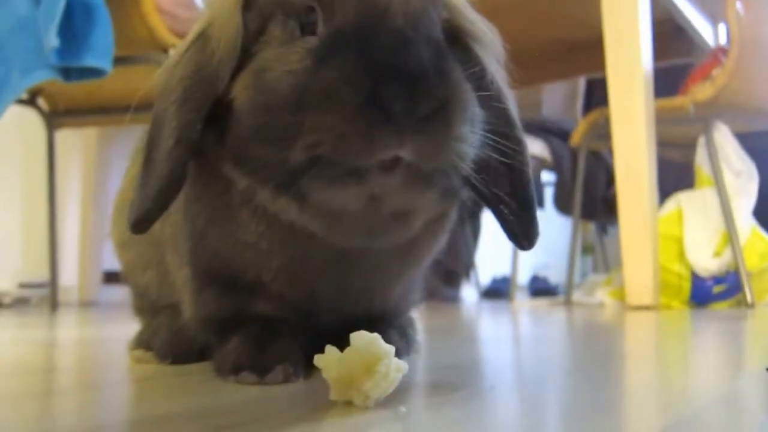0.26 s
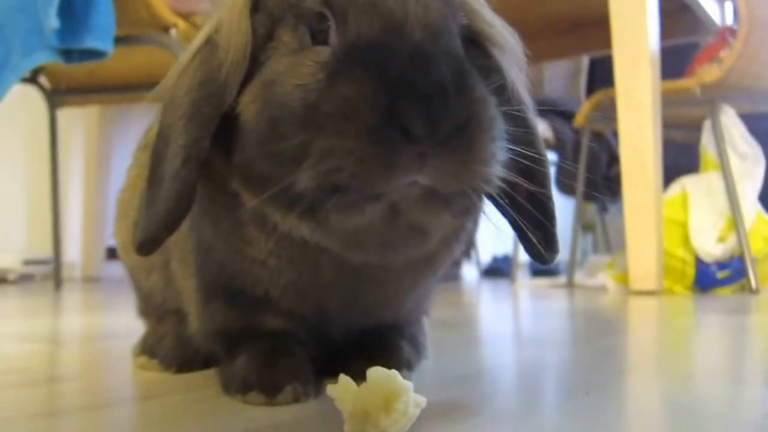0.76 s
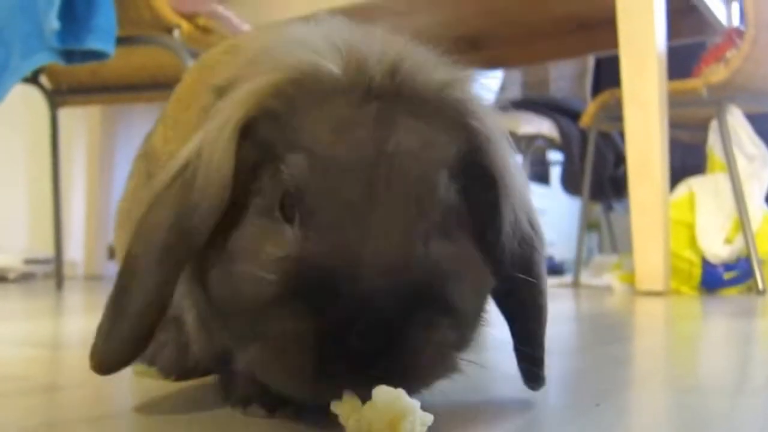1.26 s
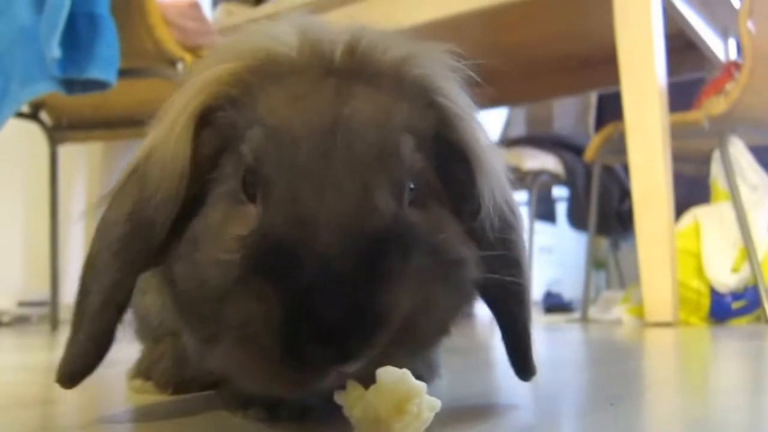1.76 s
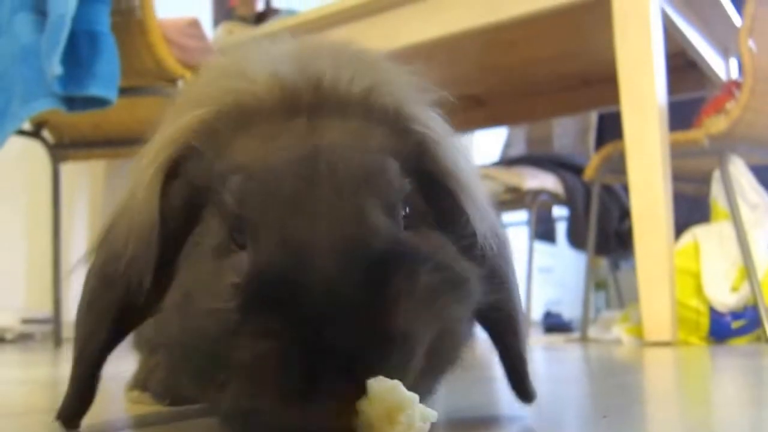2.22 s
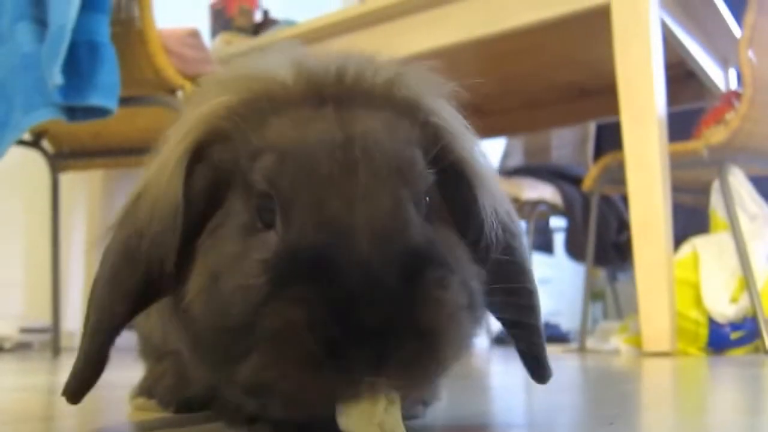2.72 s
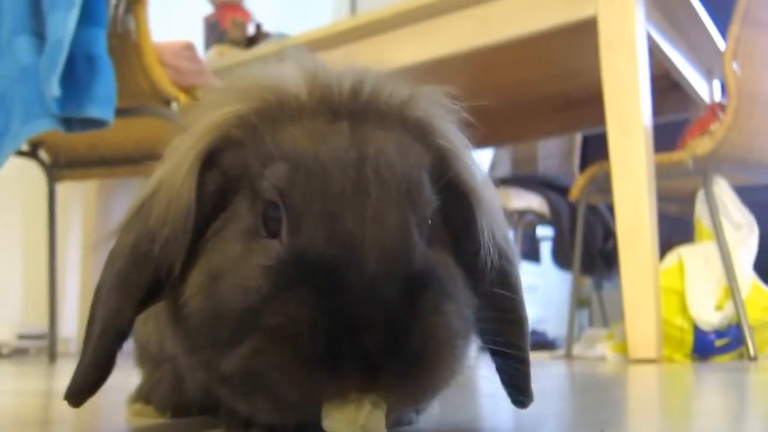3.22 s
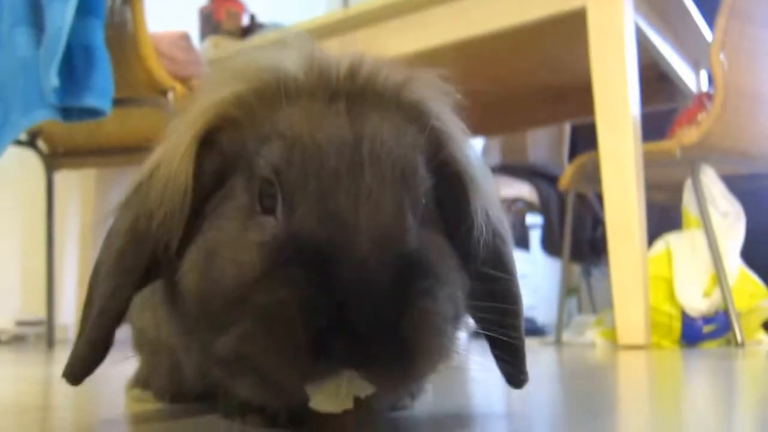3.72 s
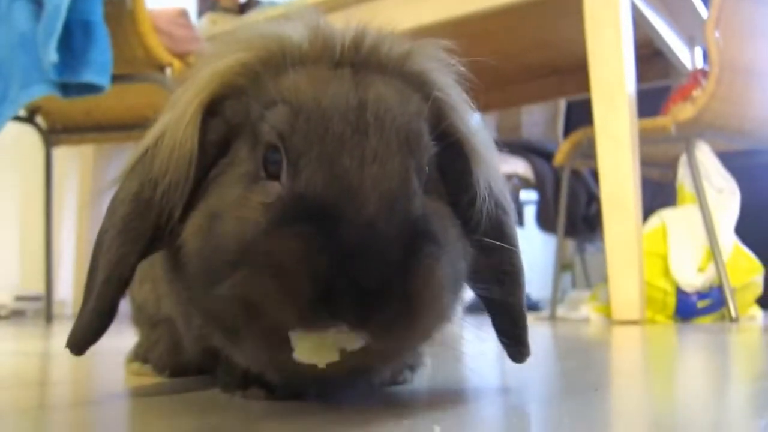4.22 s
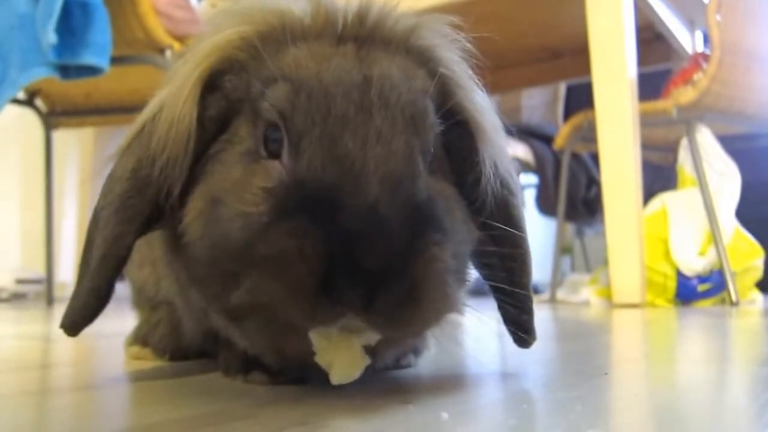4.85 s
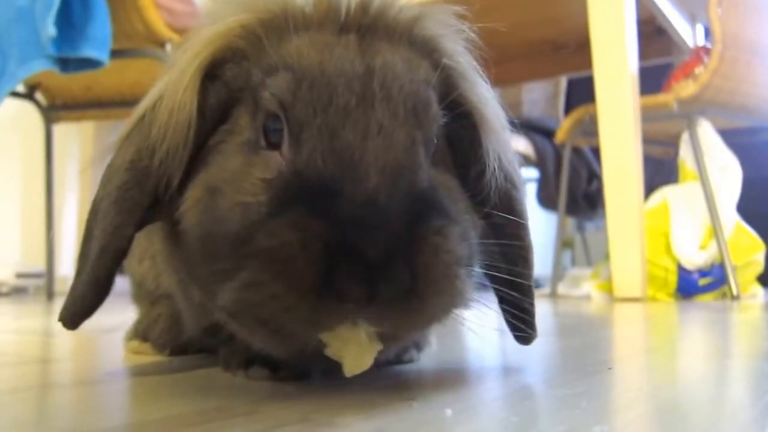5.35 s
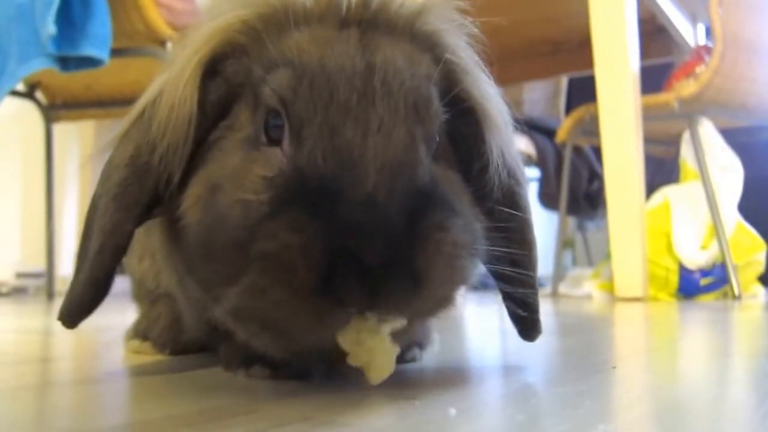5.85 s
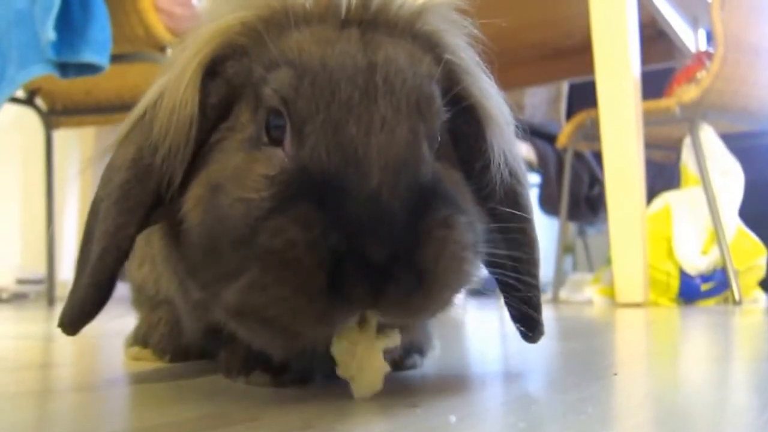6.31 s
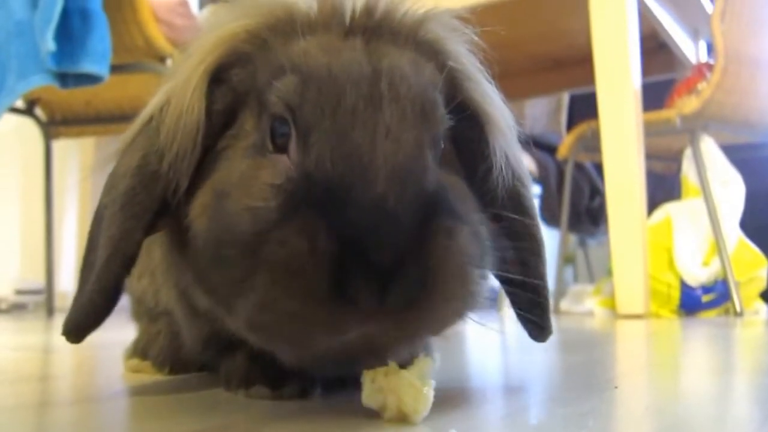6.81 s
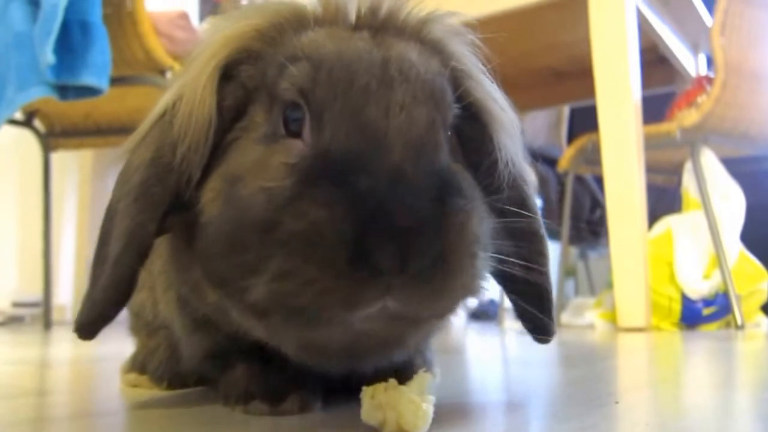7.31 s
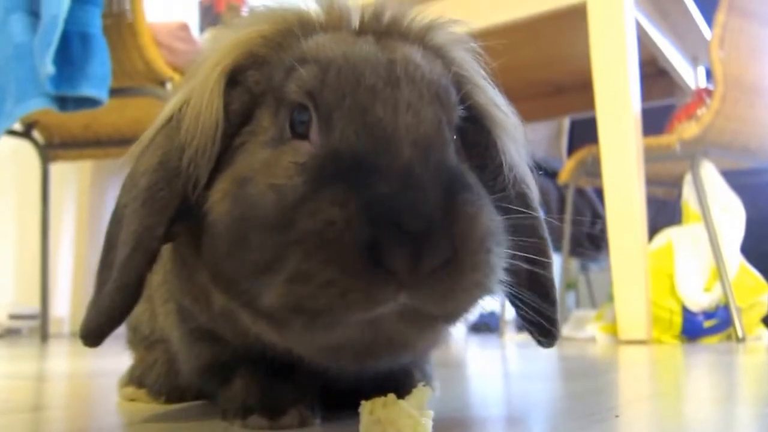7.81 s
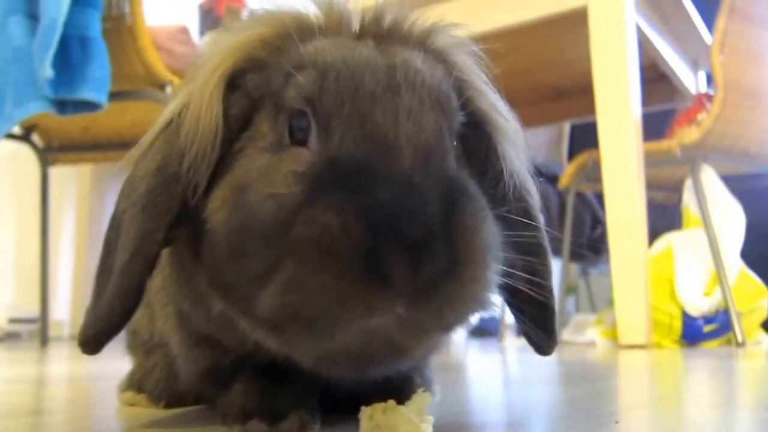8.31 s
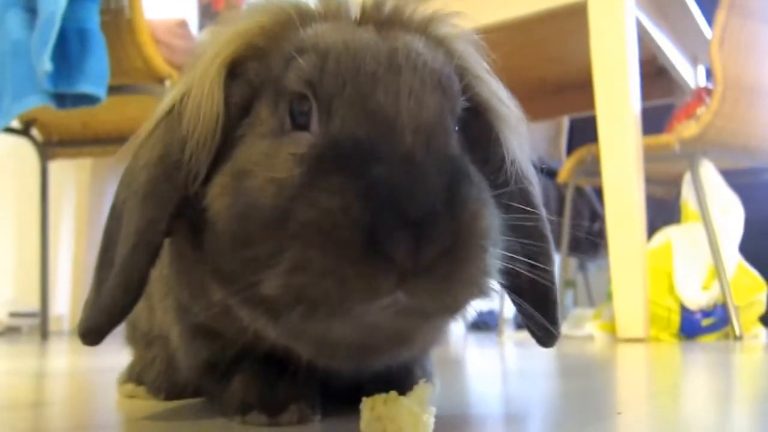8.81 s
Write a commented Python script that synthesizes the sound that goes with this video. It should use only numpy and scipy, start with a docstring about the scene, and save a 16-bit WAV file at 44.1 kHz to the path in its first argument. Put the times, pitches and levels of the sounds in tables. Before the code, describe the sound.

Close, moist nibbling by a rabbit crackles over a faint low hum, after a scuff and two loud thuds, with fur brushing softly.

```python
"""A rabbit chews a piece of banana very close to two microphones in a case, about four chews a second.
Each chew is a burst of tiny bubbles ringing in the mouth; breaking wet films add pops, snaps and ticks.
Shaped noise makes the fur brushing the case, its dull drags and scuffs, and faint rustles and squeaks.
Bumps on the case are damped swings with a short ring, and two of them are hard knocks.
Behind it all, a narrow band of noise makes a low hum, and wide noise makes the soft rush of the room."""
import sys
import numpy as np
from scipy import signal
from scipy.io import wavfile

SR = 44100
rng = np.random.default_rng(int(sys.argv[2]) if len(sys.argv) > 2 else 0)


def wrap_up_sound(samples):
    """Save the sound to the file named by the first command line argument, as 16-bit audio."""
    columns = np.atleast_2d(samples).T
    # keep every value between -1 and 1, then stretch to whole-number steps
    tamed = np.clip(columns, -1, 1)
    steps = np.round(tamed * 32767).astype(np.int16)
    wavfile.write(sys.argv[1], SR, steps)


N = 399987  # length of the scene in samples

# Room noise, its colour: [f/Hz, relative level per Hz/dB]
ROOM_SPECTRUM = [(25, -9.5), (140, -5.5), (330, -13.5), (1500, -23), (2800, -28), (6000, -33), (10500, -36),
                 (16000, -43)]
# How alike left and right are in the room noise: [f/Hz, likeness from 0 to 1]
ROOM_LIKENESS = [(30, 0.93), (500, 0.47), (3000, 0.15)]
# How alike left and right are in noise close by: [f/Hz, likeness from 0 to 1]
NEAR_LIKENESS = [(600, 0.88), (2000, 0.15), (8000, 0.026)]
# Faint rustles and squeaks of the moving rabbit: [start t/s, end t/s, level/dB, width f/Hz]
RUSTLES = [(0.25, 0.418, -59.5, 1500), (1.876, 1.91, -50.5, 200)]
# The case drags dully as it is nudged: [start t/s, end t/s, level/dB]
DRAG_STROKES = [(.004, .045, -26.5), (1.995, 2.08, -52), (2.24, 2.36, -49.5), (2.37, 2.68, -47),
                (4.892, 4.912, -30.5), (7.608, 7.63, -41), (8.955, 9.07, -52)]
# Dragging noise, its colour: [f/Hz, relative level per Hz/dB]
DRAG_SPECTRUM = [(60, -2), (280, 13), (700, 4), (1400, -32), (8000, -22)]
# Strokes of fur over the case: [start t/s, end t/s, level before the fur gain/dB]
FUR_STROKES = [(2.55, 2.68, -59), (2.79, 3.0, -54.5), (3.68, 3.978, -51.5), (4.24, 4.68, -45),
               (4.63, 4.85, -48.5), (4.865, 5.17, -47), (5.24, 5.468, -48.5), (5.88, 6.25, -50.5),
               (6.884, 7.49, -58), (8.112, 8.138, -47), (8.485, 8.58, -49), (8.57, 8.77, -56.5)]
# Fur noise, its colour: [f/Hz, relative level per Hz/dB]
FUR_SPECTRUM = [(40, -11), (190, -2.5), (380, 2.5), (600, -1.5), (1400, -12.5), (2800, -15), (4200, -16.5),
                (10500, -19), (16000, -35)]
# Level curve of the scuff as the case settles: [t/s, level before the scuff gain/dB]
SCUFF_CURVE = [(0, -24), (.02, -25), (.065, -35.5), (.12, -37), (.16, -35), (.18, -44), (.22, -77)]
# Bumps against the case, low pitch = soft contact: [t/s, swing peak level before panning/dB, pitch f/Hz]
BUMPS = [(0.017, -25, 368), (0.16, -17, 288), (0.49, -32, 310), (1.104, -32, 312), (1.437, -26, 1470),
         (1.9931, 1, 332), (2.371, 3.5, 430), (3.993, -25.5, 533), (8.939, -26, 500), (9.041, -25.5, 614)]
# Ring of the case after a bump: [f/Hz, width f/Hz, level against the swing/dB]
CASE_MODES = [(317, 94, -12.5), (670, 70, -39), (2840, 620, -16)]
# Thin snaps of saliva on the open lips: [t/s, rms level over SNAP_SPAN_S before panning/dB]
LIP_SNAPS = [(0.2829, -51), (2.4083, -34), (2.6535, -47), (2.8094, -34), (2.818, -37), (2.9814, -38.5),
             (3.0847, -48), (3.2366, -42), (3.4688, -43), (3.5439, -41), (3.7563, -38.5), (3.8216, -38),
             (3.8832, -44), (4.1697, -32.5), (5.0523, -36), (5.0725, -25.5), (5.0795, -32), (5.1891, -34.5),
             (5.3517, -38), (5.4155, -33), (5.6357, -43), (5.7407, -29), (5.7534, -47), (6.3527, -36.5),
             (6.6235, -34.5), (7.164, -37), (7.576, -38.5), (7.804, -41), (8.3121, -44), (8.5745, -34.5),
             (8.7965, -45)]
# Wet films that break in the mouth, levels before panning:
# [t/s, cavity peak level/dB, cavity f/Hz, snap rms level over SNAP_SPAN_S/dB]
FILM_POPS = [(1.813, -30, 3870, -53), (3.314, -32, 1660, -37), (3.5645, -20.5, 5870, -41),
             (4.1109, -21.5, 2680, -38), (4.3969, -26, 3000, -34), (4.4515, -16.0, 2230, -40),
             (4.5308, -22, 1840, -36.5), (4.5597, -5.5, 2530, -27.5), (4.667, -16.0, 2550, -41),
             (4.8243, -20.5, 2090, -36.5), (4.8471, -16, 5070, -26), (5.0942, -20.0, 2950, -46),
             (5.233, -20.5, 3670, -36), (5.2602, -17.5, 3430, -36), (5.3638, -24.5, 2210, -46),
             (5.3724, -11.5, 4430, -32), (5.399, -31, 1990, -31), (5.4634, -18, 2800, -45),
             (5.4929, -18, 3430, -36), (5.5616, -35, 3050, -47), (5.7019, -26.5, 2590, -30),
             (5.7184, -15.5, 1900, -48), (5.7781, -27.5, 3220, -38), (5.804, -27, 3020, -41),
             (5.827, -13.0, 2830, -60), (5.8506, -22, 3100, -38.5), (6.0749, -26, 4150, -37.5),
             (6.0937, -24, 2690, -37), (6.3766, -29, 2330, -34.5), (6.5437, -27, 6730, -40.5),
             (6.6947, -17, 3540, -28.5), (6.948, -9.5, 7000, -48), (6.9606, -19, 1740, -22.5),
             (7.0101, -22, 1910, -38.5), (7.113, -22.5, 3500, -59), (7.169, -20, 2740, -39),
             (7.1996, -24.5, 4600, -66), (7.2771, -34, 2040, -27.5), (7.344, -18, 4300, -34.5),
             (7.366, -23.5, 4100, -41), (7.4432, -24.5, 2620, -37), (7.5808, -25.0, 3300, -47),
             (7.7465, -28, 1850, -42), (7.9, -31, 1720, -42), (7.923, -22.5, 4570, -64.0),
             (7.9724, -28.5, 2260, -39), (8.1989, -31, 2380, -37.5), (8.215, -24.5, 4500, -39.5),
             (8.3802, -30, 1990, -43), (8.4408, -18.5, 3300, -45), (8.4545, -18.5, 2430, -40),
             (8.4923, -27.5, 2210, -42), (8.8417, -18.5, 3530, -50), (8.8892, -7.0, 2160, -37.5)]
# Chews: [middle t/s, length/s, level of the squeezed pulp/dB, mouth resonance f/Hz]
CHEWS = [(3.778, 0.024, -39.5, 3820), (4.115, 0.015, -41, 3060), (4.574, 0.0046, -52, 2800),
         (5.09, 0.043, -40.5, 3180), (5.442, 0.02, -37.5, 2740), (5.492, 0.023, -39, 3260),
         (5.735, 0.055, -50, 2180), (6.093, 0.0079, -31, 2940), (6.369, 0.034, -41.5, 2570),
         (6.513, 0.03, -45.5, 2500), (6.706, 0.04, -39, 2520), (6.828, 0.031, -49.5, 2570),
         (7.013, 0.056, -43.5, 2570), (7.335, 0.04, -37.5, 1480), (7.542, 0.0073, -36, 2640),
         (7.634, 0.041, -48.5, 3500), (7.951, 0.032, -43.5, 3100), (8.209, 0.044, -43, 2730),
         (8.443, 0.038, -42, 3600), (8.87, 0.07, -43, 3080), (9.022, 0.058, -44, 2480)]

HUM_HZ, HUM_WIDTH_HZ = 104, 27.4
HUM_DB, ROOM_DB = -47.5, -48
BUMP_LAG_S = .00008    # a bump reaches the right microphone a little later
SNAP_SPAN_S = 0.0042   # time over which the rms of a snap is counted
CUTOFF_HZ = 16300      # nearly nothing is left above this


def from_db(db):
    """Turn decibels into gain; also used for pitch ratios, where 6 dB is about an octave."""
    return 10 ** (np.asarray(db) / 20)


def rms_one(x):
    """Scale a sound to rms 1."""
    return x / np.sqrt(np.mean(x ** 2) + 1e-20)


def unit_click(x):
    """Scale a click so that its rms counted over SNAP_SPAN_S is 1."""
    return x / np.sqrt(np.sum(x ** 2) / (SNAP_SPAN_S * SR))


def either_way(*shape):
    """Draw even chances between -1 and 1."""
    return 2 * rng.random(shape) - 1


def in_time(rows):
    """Join the points of a curve into a value for every sample."""
    return np.interp(np.arange(N) / SR, *np.transpose(rows))


def at_hz(points, hz):
    """Read a spectrum between its points on a log-frequency axis."""
    freqs, values = np.transpose(points)
    return np.interp(np.log(hz), np.log(freqs), values)


def drift(rate_hz):
    """Wander at random with rms 1: noise smoothed by two equal low-pass stages at rate_hz."""
    step = 40       # computed once every 40 samples, then joined by straight lines
    settle = 2000   # steps dropped while the filter settles
    r = np.exp(-2 * np.pi * rate_hz * step / SR)
    white = rng.standard_normal(N // step + settle + 2)
    slow = signal.lfilter([1], [1, -2 * r, r * r], white)[settle:]
    return np.interp(np.arange(N) / step, np.arange(len(slow)), rms_one(slow))


def resonate(x, hz, width_hz):
    """Ring one resonance, with gain 1 at its top."""
    r = np.exp(-np.pi * width_hz / SR)
    feed = np.array([1, 0, -1]) * (1 - r * r) / 2
    feedback = [1, -2 * r * np.cos(2 * np.pi * hz / SR), r * r]
    return signal.lfilter(feed, feedback, x + 1e-18)


def cut(x, hz, kind, order=2):
    """Keep low, high or band frequencies with a Butterworth filter."""
    safe_hz = np.clip(hz, 10, .45 * SR)
    return signal.sosfilt(signal.butter(order, safe_hz, kind, fs=SR, output="sos"), x)


def pan(x, left_db):
    """Make the left side louder than the right by left_db."""
    return x * from_db([[left_db / 2], [-left_db / 2]])


def add(out, s, sound):
    """Mix a short sound in at time s, in seconds."""
    start = int(np.clip(round(s * SR), 0, N - 1))
    out[:, start:start + sound.shape[-1]] += sound[..., :N - start]


def swell(start, end):
    """Shape one stroke that swells and eases off."""
    along = np.clip((np.arange(N) / SR - start) / (end - start), 0, 1)
    return np.sqrt(4 * along * (1 - along))


def strokes(rows):
    """Join a table of strokes into one loudness curve."""
    return sum(from_db(db) * swell(start, end) for start, end, db in rows)


def noise(spectrum, likeness, patchy_db, flicker_hz):
    """Add up half-octave bands of stereo noise, each flickering on its own; rms 1."""
    out = 0
    edges = 23 * 2 ** np.arange(0, 9.6, .5)
    white = rng.standard_normal((2, 2, N))
    for k, (low, high) in enumerate(zip(edges, edges[1:])):
        # neighbouring bands use different noise
        mid, side = cut(white[k % 2], [low, high], "band")
        hz = np.sqrt(low * high)
        alike = np.clip(at_hz(likeness, hz), 0, 1)
        gain = from_db(at_hz(spectrum, hz) + patchy_db * drift(flicker_hz))
        out = out + gain * (np.sqrt(1 + alike) * mid + np.sqrt(1 - alike) * side * [[1], [-1]])
    return rms_one(out)


def room():
    """A narrow noise band wavers as a low hum over the soft rush of the room."""
    band = [HUM_HZ - HUM_WIDTH_HZ / 2, HUM_HZ + HUM_WIDTH_HZ / 2]
    mid, side = cut(rng.standard_normal((2, N)), band, "band")
    hum = rms_one(mid + from_db(-12.0) * side * [[1], [-1]])
    air = noise(ROOM_SPECTRUM, ROOM_LIKENESS, patchy_db=1.0, flicker_hz=2.5)
    return pan(from_db(HUM_DB) * hum + from_db(ROOM_DB) * air, -0.41)


def rustles(hz=2650):
    """A stir of the coat whispers as a noise band; a narrow band is heard as a thin squeak."""
    out = 0
    hiss = rng.standard_normal((2, N))
    for start, end, db, width_hz in RUSTLES:
        band = resonate(resonate(hiss, hz, width_hz), hz, width_hz)
        out = out + from_db(db) * swell(start, end) * rms_one(band)
    return out


def dragging(grain_db=3, slip_rate_hz=60):
    """The nudged case sticks and slips: dull noise with an uneven level."""
    scrape = noise(DRAG_SPECTRUM, NEAR_LIKENESS, patchy_db=1.5, flicker_hz=44)
    slipping = from_db(grain_db * np.tanh(drift(slip_rate_hz)))
    return scrape * slipping * strokes(DRAG_STROKES)


def rubbing(fur_db=6.5, grain_db=4.5, hair_db=2.5, hair_rate_hz=350,
            scuff_db=3, scuff_hz=290, scuff_width_hz=260, scuff_hiss_db=-4):
    """Tufts and single hairs catch and slip on the case; the firmer scuff also drives a low resonance."""
    catching = from_db(grain_db * np.tanh(drift(30)) + hair_db * drift(hair_rate_hz))
    friction = noise(FUR_SPECTRUM, NEAR_LIKENESS, patchy_db=2.0, flicker_hz=18) * catching
    fur = from_db(fur_db) * strokes(FUR_STROKES) * friction
    low_ring = resonate(friction, scuff_hz, scuff_width_hz)
    scuff = rms_one(low_ring + from_db(scuff_hiss_db) * friction)
    return fur + from_db(scuff_db + in_time(SCUFF_CURVE)) * scuff


def bumps(damping=0.71, hardness=3.75, brightest_hz=1400,
          tail_db=-37, tail_s=0.036, rattle_db=-40, rattle_s=0.0092):
    """A bump gives one heavily damped swing, and the case rings and rattles briefly."""
    out = np.zeros((2, N))
    t = np.arange(SR // 4) / SR
    impulse = signal.unit_impulse(len(t))
    for s, db, hz in BUMPS:
        # the case flexes a little differently at each microphone
        pitches = hz * from_db(either_way(2))
        swing = np.array([resonate(impulse, f, damping * f) for f in pitches])
        swing = cut(swing, min(hardness * hz, brightest_hz), "low")
        sound = swing / np.abs(swing).max()
        for mode_hz, width_hz, mode_db in CASE_MODES:
            strength = from_db(mode_db + 2 * rng.normal(size=(2, 1)))
            fading = np.exp(-np.pi * width_hz * t)
            sound = sound + strength * fading * np.sin(2 * np.pi * mode_hz * t)
        # the tail is the same on both sides, the rattle is not
        tail = rms_one(cut(rng.standard_normal(len(t)), [200, 850], "band", order=4))
        rattle = rms_one(cut(rng.standard_normal((2, len(t))), [200, 4500], "band"))
        sound = sound + from_db(tail_db) * tail * np.exp(-t / tail_s)
        sound = sound + from_db(rattle_db) * rattle * np.exp(-t / rattle_s)
        left, right = pan(from_db(db) * sound, -2.6)
        add(out[:1], s, left)
        add(out[1:], s + BUMP_LAG_S, right)
    return out


def pop(cavity_db, cavity_hz, snap_db, snap_hz=10500, snap_width_hz=2600,
        scatter_db=-17, lowest_hz=1300):
    """A wet film breaks: a sharp snap, and a cycle or two from the little cavity behind it."""
    t = np.arange(SR // 60) / SR
    impulse = signal.unit_impulse(len(t))
    cavity = resonate(impulse, cavity_hz, cavity_hz / 2)
    cavity = cut(cavity, 2.03 * cavity_hz, "low", order=1)
    cavity = cut(cavity, lowest_hz, "high")
    cavity = cavity / np.abs(cavity).max()
    # the snap differs in colour from pop to pop, and a little between the microphones
    tints_db = .6 * (either_way(1) + either_way(2))
    snap = np.array([unit_click(resonate(impulse, snap_hz * from_db(tint), snap_width_hz))
                     for tint in tints_db])
    direct = pan(from_db(cavity_db) * cavity, -1.9) + pan(from_db(snap_db) * snap, 1.9)
    # face, floor and case scatter a little of it, differently to each microphone
    scatter_s = .0025
    fading = np.exp(-t / scatter_s) * np.sqrt(2 / (scatter_s * SR))
    scatter = rng.standard_normal((2, len(t))) * fading
    scattered = signal.fftconvolve(direct, scatter, axes=1)[:, :len(t)]
    return direct + from_db(scatter_db) * scattered


def small_pop(db, bright, colour, snap_db=-13, tilt_db=4, cavity_hz=3600, pitch_spread_db=14.0):
    """A small film breaks, from dull to bright and from low to high (both -1 to 1)."""
    pitch_hz = cavity_hz * from_db(pitch_spread_db * colour)
    return pop(db - tilt_db * bright, pitch_hz, db + snap_db + tilt_db * bright)


def ticks(count=5, scatter_s=0.05, level_db=-54, spread_db=9.5):
    """Ticks of saliva crowd around every film and thread that breaks; most are faint, a few crisp."""
    out = np.zeros((2, N))
    times = np.repeat([row[0] for row in FILM_POPS + LIP_SNAPS], count)
    times = times + scatter_s * rng.laplace(size=len(times))
    sizes = np.minimum(rng.exponential(size=len(times)), np.e)
    for s, size, (bright, colour) in zip(times, sizes, either_way(len(times), 2)):
        add(out, s, small_pop(level_db + spread_db * size, bright, colour))
    return out


def lip_snaps(body_db=-6, body_hz=3000, thread_hz=11400):
    """Threads of saliva part with a thin, high tick and a weaker body."""
    out = np.zeros((2, N))
    for s, db in LIP_SNAPS:
        add(out, s, pop(db + body_db, body_hz, db, snap_hz=thread_hz))
    return out


def film_pops(after_db=-15, after_s=0.0017):
    """A film gives way with one clean pop, and its torn edge follows with a much weaker one."""
    out = np.zeros((2, N))
    for s, cavity_db, cavity_hz, snap_db in FILM_POPS:
        when, colour = either_way(2)
        add(out, s, pop(cavity_db, cavity_hz, snap_db))
        after = pop(cavity_db + after_db, cavity_hz * from_db(2 * colour), snap_db + after_db)
        add(out, s + after_s * (1 + when / 2), after)
    return out


def pulp(fizz_db=-12, opening=0.18, bubbles_per_s=650, damping=.3, size_spread_db=9):
    """A moist smack: separate tiny bubbles ring the mouth, whose resonance rises as the lips part."""
    out = np.zeros((2, N))
    for s, length_s, db, hz in CHEWS:
        length = int(length_s * SR)
        along = np.linspace(-.5, .5, length)
        sizes = from_db(size_spread_db * np.minimum(rng.exponential(size=(2, length)), 2.5))
        bursting = rng.random(length) < bubbles_per_s / SR
        froth = bursting * sizes * np.sign(either_way(2, length))
        # fade from the closed mouth to the higher, open one
        closed, parted = [resonate(resonate(froth, f, damping * f), f, f)
                          for f in (hz * (1 - opening), hz * (1 + opening))]
        body = rms_one(closed * (.5 - along) + parted * (.5 + along))
        fizz = rms_one(resonate(froth, 10700, 4000))
        mid, side = (body + from_db(fizz_db) * fizz) * np.cos(np.pi * along)
        add(out, s - length_s / 2, from_db(db) * (mid + side / 2 * [[1], [-1]]))
    return out


def scene(snap_top_hz=14500):
    """Mix the room, the contact with the case, and the mouth."""
    surroundings = room() + rubbing() + dragging() + rustles() + bumps()
    wet_breaks = cut(film_pops() + lip_snaps() + ticks(), snap_top_hz, "low")
    return surroundings + wet_breaks + pulp()


def record(dry, notch_hz=8250, notch_width_hz=1800, core_width_hz=450,
           ring_hz=2800, ring_width_hz=450, ring_db=-10):
    """The housing adds a mild resonance and a deep treble notch; peaks past full scale clip; the top is cut."""
    coloured = dry + from_db(ring_db) * resonate(dry, ring_hz, ring_width_hz)
    for width_hz in (notch_width_hz, core_width_hz):
        coloured = signal.lfilter(*signal.iirnotch(notch_hz, notch_hz / width_hz, fs=SR), coloured)
    clipped = np.clip(coloured, -1, 1)
    return signal.sosfilt(signal.ellip(8, .3, 70, CUTOFF_HZ, fs=SR, output="sos"), clipped)


dry = scene()
out = record(dry)
wrap_up_sound(out)
```